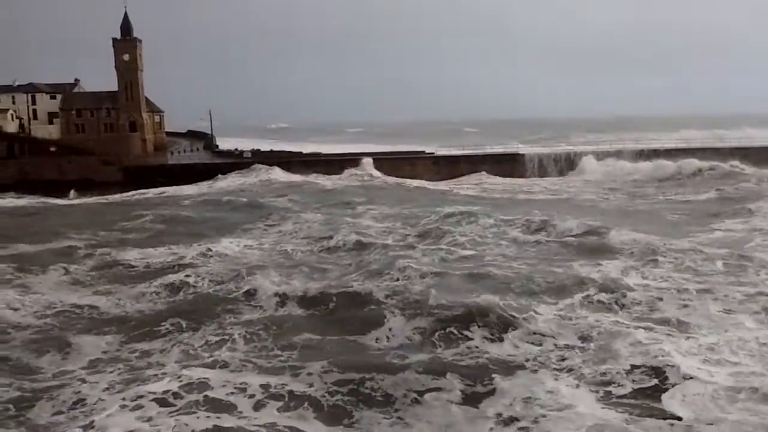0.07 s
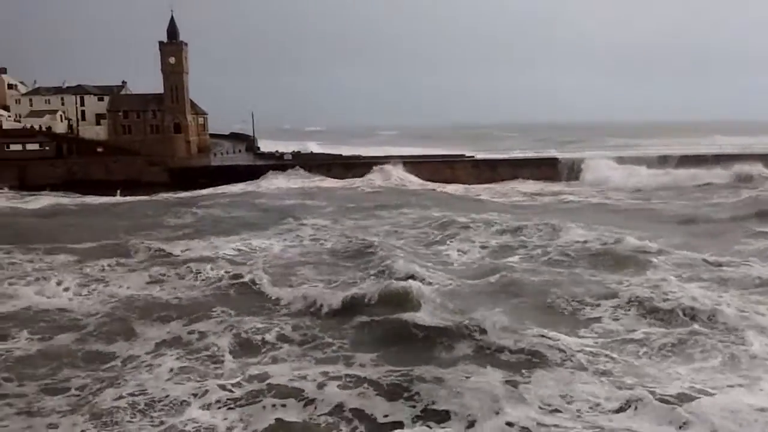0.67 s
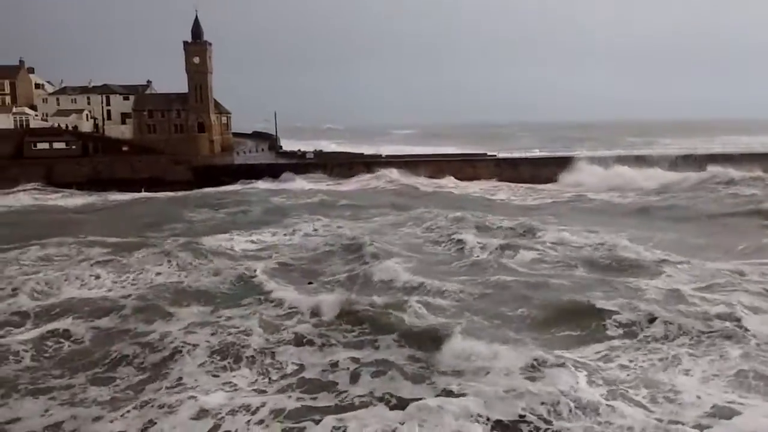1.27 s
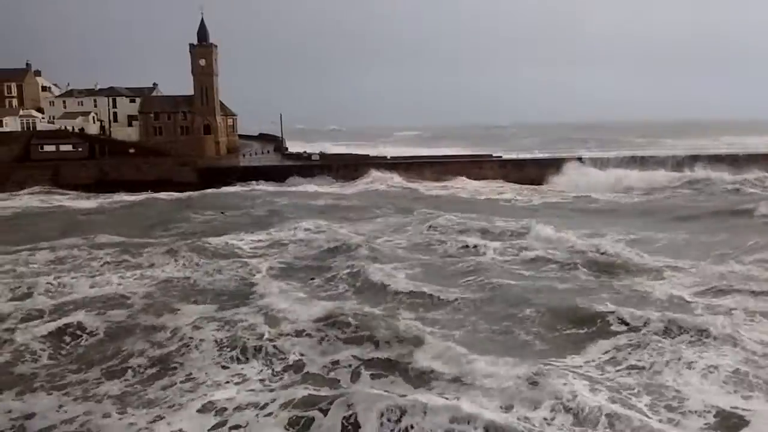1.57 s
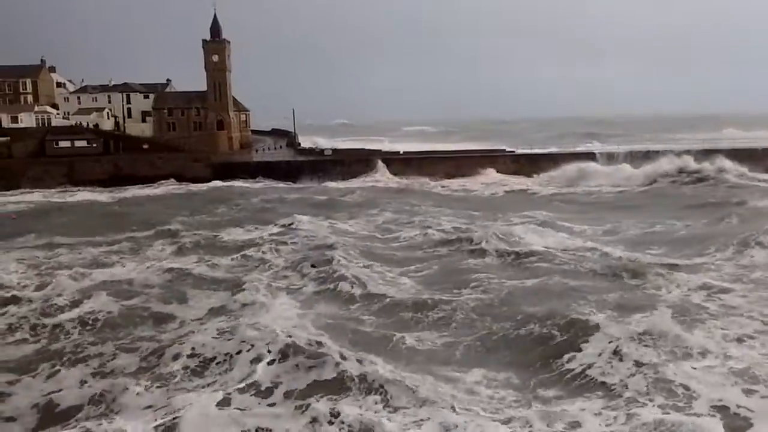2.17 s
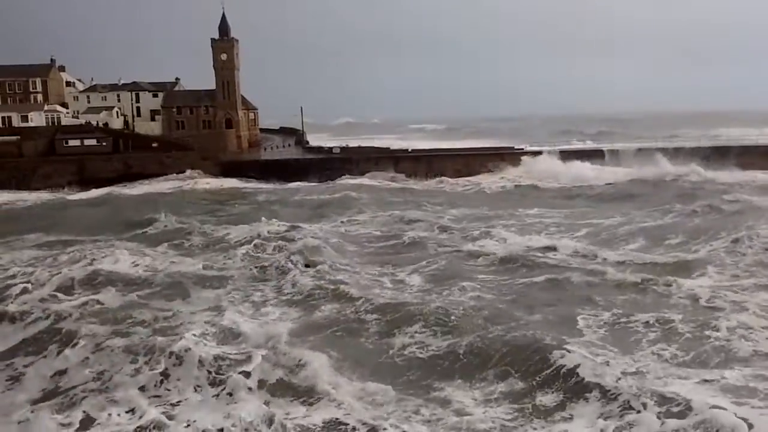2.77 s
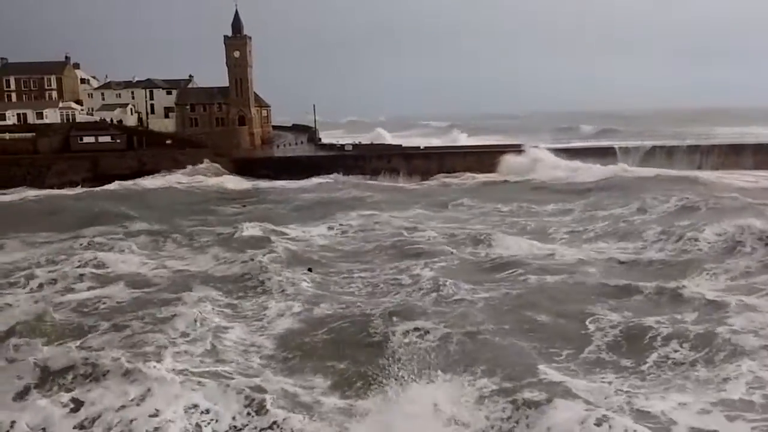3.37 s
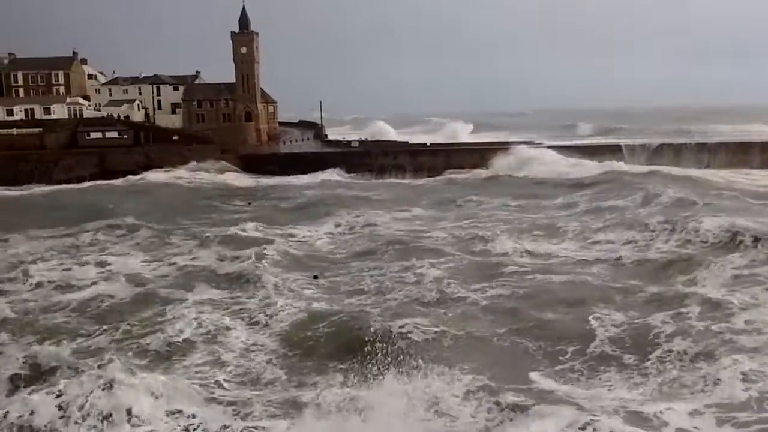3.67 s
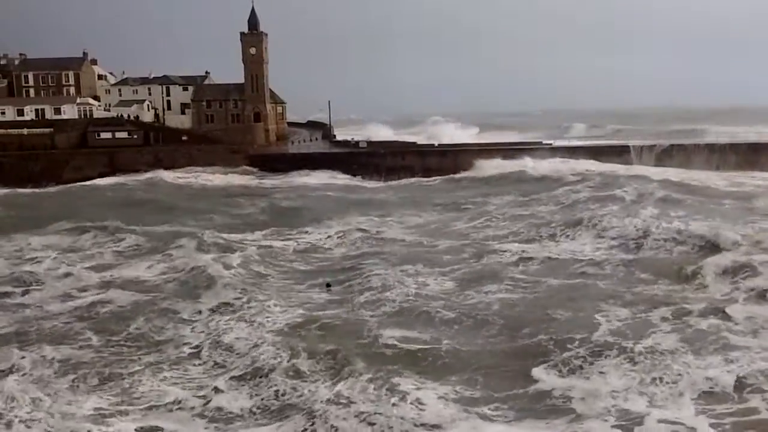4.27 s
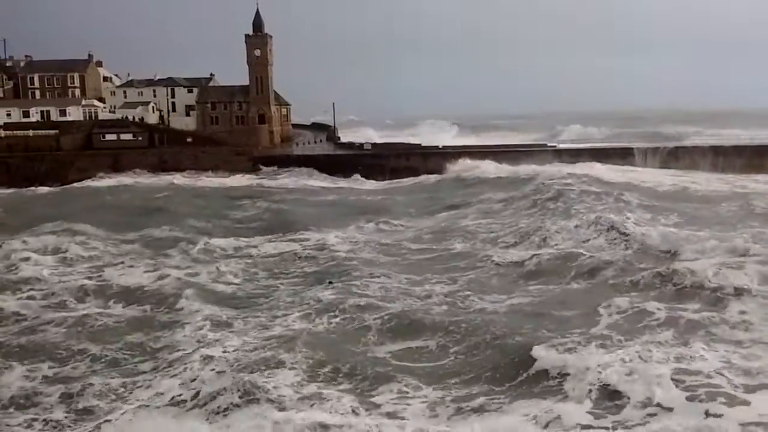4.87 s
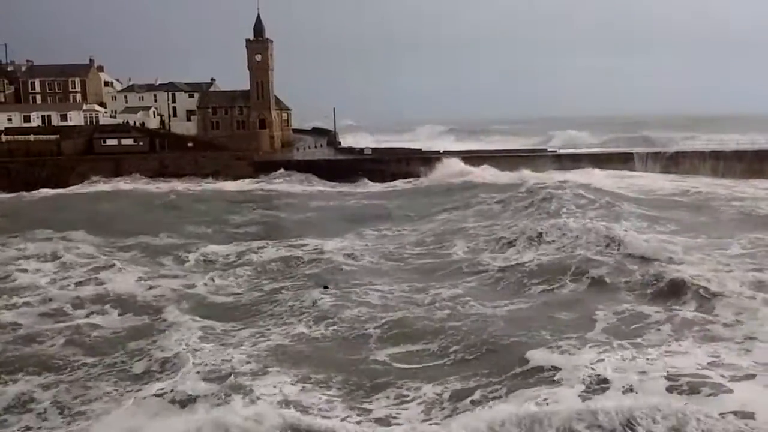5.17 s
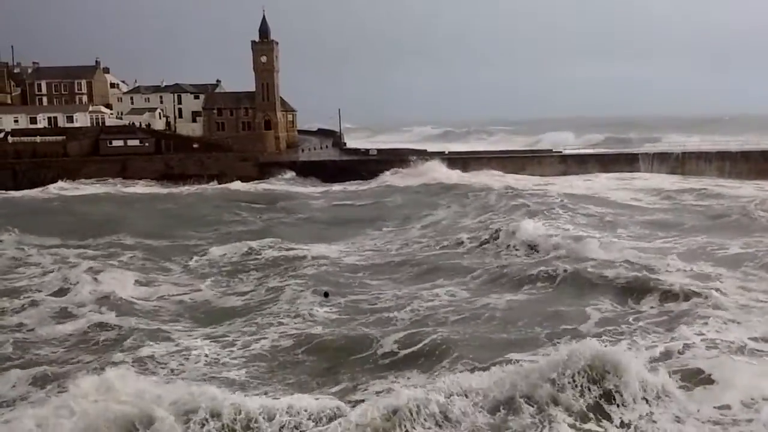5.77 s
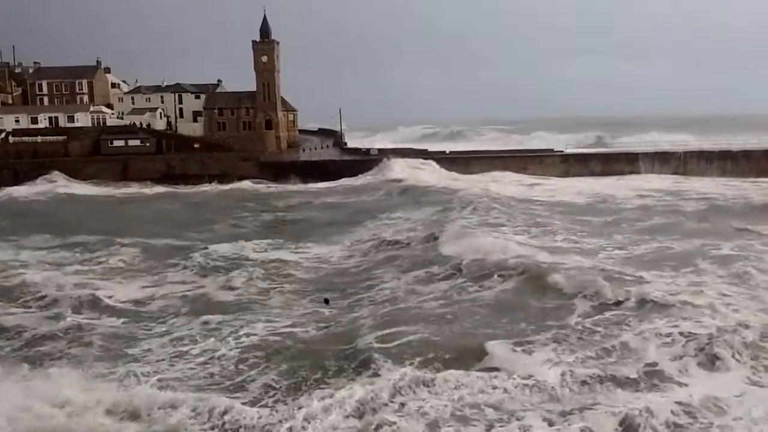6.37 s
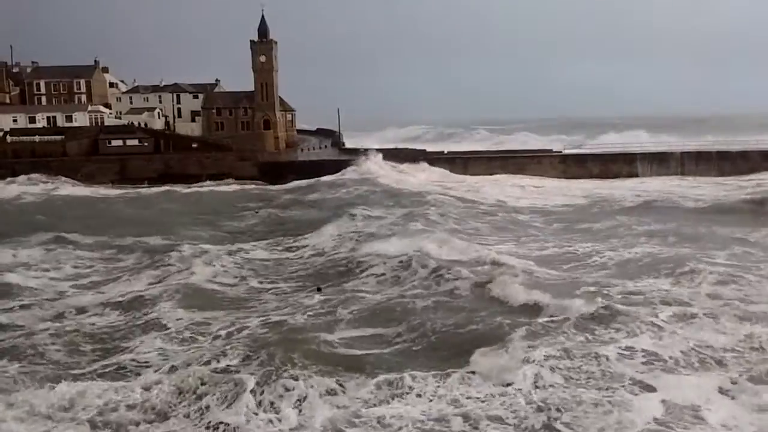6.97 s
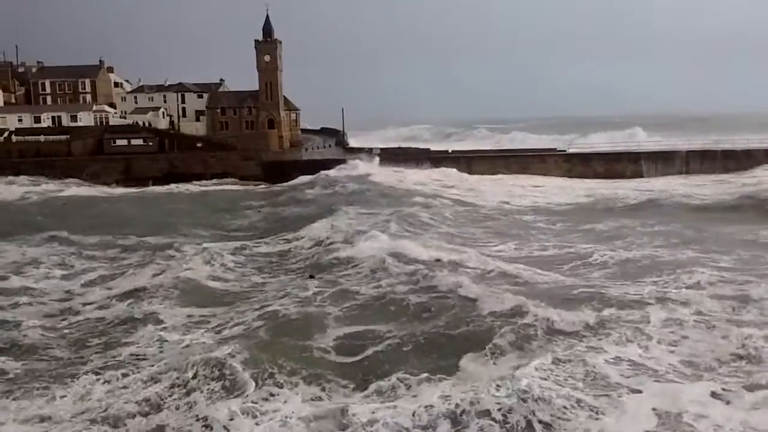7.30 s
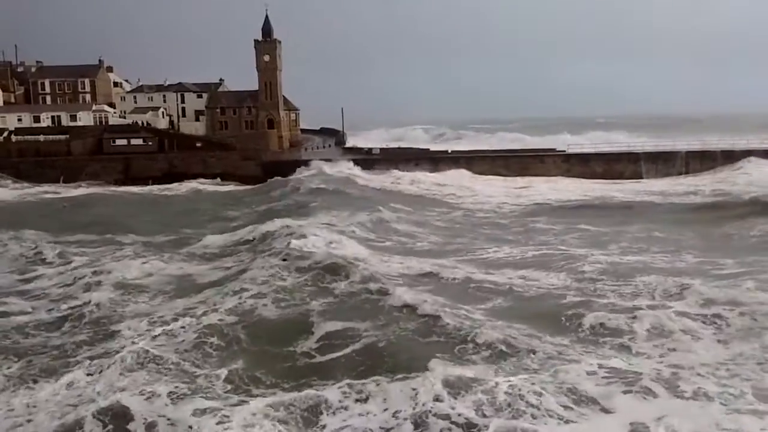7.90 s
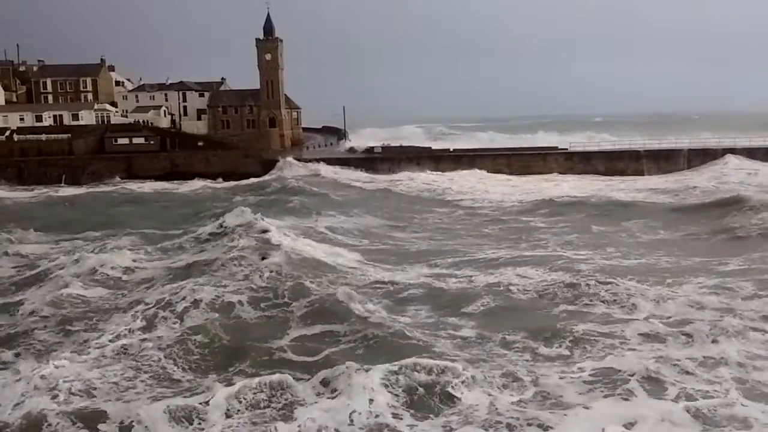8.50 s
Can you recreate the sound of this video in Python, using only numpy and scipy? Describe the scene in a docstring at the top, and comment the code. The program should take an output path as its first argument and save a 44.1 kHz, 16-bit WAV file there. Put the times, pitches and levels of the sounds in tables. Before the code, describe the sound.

Storm waves roar and fizz while strong wind buffets the microphone; two sharp drop hits briefly duck the sound before it swells back.

```python
"""Below a harbour wall, storm surf churns in a gale, heard through two close microphone ports.
Clouds of bubbles roar in the breakers over distant surf, foam fizzes and thrown water rains back.
Eddies rumble and thump on the ports, and spray spatters the housing.
Two drops and a hard gust strike a port; the limiter ducks and the sea swells slowly back."""
import sys
import numpy as np
from scipy import signal
from scipy.fft import rfft, irfft, next_fast_len
from scipy.io import wavfile
from scipy.ndimage import uniform_filter1d, minimum_filter1d

SR = 44100
rng = np.random.default_rng(int(sys.argv[2]) if len(sys.argv) > 2 else 0)


def digitize_waveform(pressure):
    """Quantize a signal to 16-bit integers and store it at the path in sys.argv[1].

    Rows of a 2-D input are taken as channels; values are limited to [-1, 1].
    """
    field = np.atleast_2d(pressure).T
    bounded = np.clip(field, -1, 1)
    quanta = np.round(bounded * 32767).astype(np.int16)
    wavfile.write(sys.argv[1], SR, quanta)


N = 376613
TIME = np.arange(N) / SR
FFT_SIZE = next_fast_len(N + 4096)
FREQS = np.fft.rfftfreq(FFT_SIZE, 1 / SR)


def undb(db):
    """Decibels to gain."""
    return 10 ** (np.asarray(db) / 20)


def unit(x):
    """Scale to rms 1."""
    return x / np.sqrt(np.mean(x ** 2))


def response(points):
    """An EQ curve: the gain at every frequency, drawn through points of f/Hz, level/dB."""
    hz, db = np.transpose(points)
    return undb(np.interp(np.log(FREQS + 1), np.log(hz), db))


def shape(x, gain):
    """Filter by a gain at every frequency."""
    return irfft(rfft(x, FFT_SIZE) * gain, FFT_SIZE)[..., :N]


def wander(rate_hz):
    """A smooth random modulator: sample and hold, slewed twice, at rms 1."""
    hold = int(SR / rate_hz)
    steps = np.repeat(rng.standard_normal(N // hold + 1), hold)
    return unit(uniform_filter1d(uniform_filter1d(steps, hold), hold)[:N])


def swell(crest_s, build_s, settle_s):
    """An envelope that rises smoothly to 1 at the crest and falls smoothly away."""
    age = TIME - crest_s
    return np.exp(-(age / np.where(age < 0, build_s, settle_s)) ** 2)


def noise():
    """White noise."""
    return rng.standard_normal(N)


def bursts(per_s, spread_db):
    """Bursting bubbles or droplets: many small clicks and a few big ones."""
    happens = rng.random(N) < per_s / SR
    clicks = happens * noise()
    size_db = spread_db * np.minimum(rng.exponential(size=N), 5)
    return unit(clicks * undb(size_db))


def at_ports(draw, shared):
    """Sound from all round differs between the ports; a share from straight ahead is alike."""
    return np.sqrt(1 - shared) * np.array([draw(), draw()]) + np.sqrt(shared) * draw()


def far_surf(level_db=-43.5):
    """Surf along the harbour wall merges into a dull, steady rumble."""
    # tone of the distant surf: f/Hz, level/dB
    rumble_eq = [(60, -22), (250, -3), (430, -3), (750, -10.5), (1500, -12), (4000, -60)]
    return unit(shape(at_ports(noise, shared=0.026), response(rumble_eq))) * undb(level_db)


def showers(build_s=0.081):
    """Water thrown up by a wave rains back in a bright, grainy hiss."""
    # tone of the falling water: f/Hz, level/dB
    hiss_eq = [(3000, -22), (5000, 3), (5700, 1), (6400, -8), (8000, 3), (10500, 0), (12500, -9),
               (15000, -9)]
    # falls of thrown water: crest t/s, level/dB, settling/s
    falls = [(4.02, -37, 0.27), (4.3, -40.5, 0.38), (7.06, -44, 0.3), (7.45, -45, 0.86)]
    envelope = sum(undb(db) * swell(s, build_s, settle_s) for s, db, settle_s in falls)
    drops = at_ports(lambda: bursts(per_s=5000, spread_db=2.5), shared=0.05)
    return unit(shape(drops, response(hiss_eq))) * envelope


def spray(lee_db=-8):
    """Flurries of fine droplets hit the housing, hardest on the windward right side."""
    # tone of droplets on the housing: f/Hz, level/dB
    droplet_eq = [(2500, -12), (5000, 3), (7000, 5), (9500, 3), (12000, -5), (15500, -24)]
    # flurries on the windward side: t/s, level/dB, decay/ms
    flurries = [(.245, -37, 50), (2.165, -22.5, 7.6), (2.556, -26, 21), (2.62, -44, 110), (2.677, -18, 1)]
    envelope = sum(undb(db) * (TIME >= s) * np.exp(-1000 * np.abs(TIME - s) / ms)
                   for s, db, ms in flurries)
    droplets = at_ports(lambda: bursts(per_s=12000, spread_db=2), shared=0)
    return unit(shape(droplets, response(droplet_eq))) * envelope * undb([[lee_db], [0]])


def gale():
    """Strength of the wind, 1 when it blows steadily."""
    # gusts and lulls against the steady gale: t/s, level/dB, rise and fall/s
    gusts = [(.05, 3, 0.089), (.28, 5, .056), (.46, 1.5, 0.035), (.7, 1, .2), (1.26, 1.5, 0.079),
             (1.52, 3.5, 0.044), (1.81, 3.5, 0.035), (2.05, 4, .07), (2.23, -3, 0.083), (2.77, 3.5, .046),
             (4.5, -1.5, .35), (6, 1.4, 0.27), (6.42, 1.5, 0.048), (6.7, -3, 0.13), (6.99, 1.5, .068),
             (7.31, 6, 0.072), (7.65, -0.5, 0.19), (8.37, 1, .08)]
    return undb(sum(db * swell(s, width_s, width_s) for s, db, width_s in gusts))


def wind(level_db=-27.5, flutter_hz=24, flutter_db=1.47, headroom=3.14):
    """Turbulence rumbles on each port separately and flutters within each gust."""
    # tone of the turbulence: f/Hz, level/dB
    rumble_eq = [(20, -8), (50, 0.5), (105, 2), (160, -2.5), (250, -11), (350, -15.5), (600, -17.5),
                 (1500, -52), (4000, -62)]
    rumble = unit(shape(at_ports(noise, shared=0), response(rumble_eq)))
    rumble *= undb(flutter_db * wander(flutter_hz))
    # the wind speed bounds the pressure that an eddy can reach
    return headroom * np.tanh(rumble / headroom) * undb(level_db) * gale()


def eddy(age, hz, cycles=0.46):
    """Pressure under a passing eddy: one push, then one pull; peak 1."""
    swing = -np.sin(2 * np.pi * hz * age) * np.exp(-(hz * age / cycles) ** 2)
    return swing / np.abs(swing).max()


def buffets(knocks_per_s=13, knock_db=-20, wake_db=-18, lee_db=-2.5):
    """Big eddies thump the housing, each in a ragged wake; small ones knock at random."""
    # big eddies on the windward side: t/s, level/dB, swing f/Hz
    big_eddies = [(0.664, -13.5, 70), (0.948, -12, 95), (0.983, -22, 90), (1.076, -13, 80),
                  (1.332, -14, 75), (1.6, -15, 80), (1.866, -14, 91), (2.097, -18, 125), (2.752, -17, 90),
                  (2.769, -19, 110), (2.785, -16, 100), (6.414, -16, 90), (6.44, -14, 175),
                  (6.458, -15, 165), (6.586, -13, 185), (6.611, -13, 180), (6.636, -20, 185),
                  (6.873, -15, 199), (7.275, -3.5, 175), (7.335, -7, 178), (7.652, -10.5, 158),
                  (8.357, -12, 101)]
    # tone of their wakes: f/Hz, level/dB
    wake_eq = [(30, -14), (110, 3), (260, -6), (420, -18), (900, -19), (3000, -70)]
    thumps = sum(undb(db) * eddy(TIME - s, hz) for s, db, hz in big_eddies)
    arrivals = (rng.random(N) < knocks_per_s / SR) * rng.uniform(-0.98, 1, N)
    knock = eddy(TIME[:2048] - TIME[1024], hz=79)
    knocks = undb(knock_db) * signal.fftconvolve(arrivals, knock, mode="same") * gale()
    stirred = sum(undb(db + wake_db) * swell(s, build_s=0.013, settle_s=0.02) for s, db, _ in big_eddies)
    wake = unit(shape(at_ports(noise, shared=0.76), response(wake_eq))) * stirred
    roughness = 1 + 0.3 * wander(rate_hz=600)
    return ((thumps + knocks) * roughness + wake) * undb([[lee_db], [0]])


def strikes(swing_decay_s=0.005, through_housing=0.27):
    """A drop rings the port's tiny cavity; drop or gust pushes the diaphragm through one slow swing."""
    # resonances of the cavity: f/Hz, level/dB, decay/ms
    cavity_modes = [(2220, -21, 0.13), (4400, 3, 0.16), (8850, 12, 0.15), (11600, -13, 0.11)]
    # two drops and a hard gust on the right port: t/s, tick level/dB, swing level/dB, swing f/Hz
    hits = [(3.1015, 12.5, -14, 100), (3.2527, 16, -3, 115), (7.2722, -28, -8, 174)]
    out = np.zeros((2, N))
    t = TIME[:1000]
    ring = sum(undb(db) * np.sin(2 * np.pi * hz * t) * np.exp(-1000 * t / ms)
               for hz, db, ms in cavity_modes)
    tick = ring / np.abs(ring).max()
    for s, tick_db, swing_db, swing_hz in hits:
        swing = np.sin(2 * np.pi * swing_hz * t) * np.exp(-t / swing_decay_s)
        span = slice(int(s * SR), int(s * SR) + len(t))
        out[1, span] += undb(swing_db) * swing - undb(tick_db) * tick
        # the housing carries the tick across to the other port
        out[0, span] -= through_housing * undb(tick_db) * tick
    return out


def plunge(level_db=-32.5, centre_hz=1650, width_octaves=0.17):
    """The nearest breaker traps a cloud of air; bubbles of much the same size ring in one band."""
    band = np.exp(-(np.log2((FREQS + 1) / centre_hz) / width_octaves) ** 2 / 2)
    bubbles = unit(shape(at_ports(noise, shared=0.1), band))
    return bubbles * undb(level_db) * swell(crest_s=5, build_s=0.38, settle_s=0.3)


def churn(x, eq, depth_db, rate_hz=16):
    """Colour a sound and let each octave swell on its own, as patches of water break and settle."""
    spectrum = rfft(x, FFT_SIZE) * response(eq)
    octave = np.clip(np.log2((FREQS + 1) / 200), 0, 6)
    out = 0
    for k in range(7):
        band_gain = np.maximum(0, 1 - np.abs(octave - k))
        band = irfft(spectrum * band_gain, FFT_SIZE)[:, :N]
        out = out + band * undb(depth_db * wander(rate_hz))
    return unit(out)


def sea_levels(roar_bed_db=-33, fizz_bed_db=-39.5, foam_linger=1.14):
    """Envelopes of roar and fizz: each breaker adds its power to the bed of churning sea."""
    # breaking waves: crest t/s, roar level/dB, fizz level/dB, build-up/s, roar settling/s
    breakers = [(.2, -29.5, -37.5, 0.54, 0.31), (.66, -32.5, -40.2, 0.19, 0.19),
                (1.22, -34.5, -36.2, 0.4, 0.36), (1.78, -33, -44.3, .11, 0.093),
                (1.99, -32, -36.5, 0.7, 0.92), (2.6, -30.5, -32.8, 0.077, 0.34),
                (3.05, -34, -34.5, 0.21, .27), (3.22, -30, -37.5, 0.27, 0.51),
                (4.03, -29.5, -36, 0.37, .08), (4.31, -30.5, -30, 0.4, .41), (5.2, -35, -33.5, 0.24, 0.32),
                (5.36, -29.5, -33.5, 0.89, 0.61), (6.04, -29, -35, 0.74, 0.49),
                (6.41, -31, -38, 0.069, .15), (7.07, -34.5, -36, 0.33, 0.42), (7.78, -35, -44, .67, 0.68),
                (8.29, -31, -37, 0.1, 0.31)]
    roar_power, fizz_power = undb(roar_bed_db) ** 2, undb(fizz_bed_db) ** 2
    for s, roar_db, fizz_db, build_s, settle_s in breakers:
        roar_power += (undb(roar_db) * swell(s, build_s, settle_s)) ** 2
        fizz_power += (undb(fizz_db) * swell(s, build_s, settle_s * foam_linger)) ** 2
    return np.sqrt(roar_power), np.sqrt(fizz_power)


def surf():
    """Clouds of bubbles roar in the breakers; the foam they leave bursts in a dense fizz."""
    # tone of the bubble clouds: f/Hz, level/dB
    roar_eq = [(60, -31), (250, -8.5), (450, -6), (750, -1.05), (1200, 0), (1650, 1), (2100, -2),
               (2550, -5), (3000, -9.5), (3600, -10), (6000, -62)]
    # tone of the bursting foam: f/Hz, level/dB
    fizz_eq = [(1500, -12), (2500, 3.5), (3050, 0.5), (3700, 0.9), (4200, 1.5), (4700, 2.5), (5400, -6),
               (6300, -11), (7700, -6), (9600, -8), (11000, -14.5), (12500, -19.5), (14000, -23.5),
               (15500, -24)]
    roar_gain, fizz_gain = sea_levels()
    roar = churn(at_ports(noise, shared=0.043), roar_eq, depth_db=0.88)
    foam = at_ports(lambda: bursts(per_s=25000, spread_db=1.5), shared=0.09)
    fizz = churn(foam, fizz_eq, depth_db=1.2)
    return roar * roar_gain + fizz * fizz_gain


def scene():
    """Sea, wind and flying water as pressure at the two ports."""
    return surf() + far_surf() + plunge() + wind() + buffets() + strikes() + spray() + showers()


def widen(ports, port_lag_s=14 / SR):
    """Each channel subtracts the other port's delayed sound; lifting the side boosts the wind too."""
    # crossfeed from the opposite port: f/Hz, level/dB
    crossfeed_eq = [(100, -2), (1500, -4), (6500, -4.5), (9500, -10), (15000, -42)]
    # lift of the side signal: f/Hz, level/dB
    side_eq = [(25, -5), (50, 2), (100, 8.5), (250, 14.5), (650, 10), (1000, 4.5), (1600, 2), (4000, 1.5)]
    # the channels' unequal sensitivity: f/Hz, left minus right level/dB
    balance = [(60, 1), (400, 1), (700, 2), (2000, -0.3), (3200, 4), (4700, -1), (6000, 6), (7500, -4.5),
               (10500, 2.2), (14000, 2)]
    crossfeed = response(crossfeed_eq) * np.exp(-2j * np.pi * FREQS * port_lag_s)
    mid = shape((ports[0] + ports[1]) / 2, 1 - crossfeed)
    side = shape((ports[0] - ports[1]) / 2, (1 + crossfeed) * response(side_eq))
    lean = np.sqrt(response(balance))
    return np.array([shape(mid + side, lean), shape(mid - side, 1 / lean)])


def limiter(x, ceiling_db=-0.7, recovery_db_per_s=10.5):
    """The gain ducks just ahead of any peak over the ceiling and creeps back at a steady rate."""
    peak_db = 20 * np.log10(np.abs(x).max(axis=0) + 1e-9)
    over_db = np.maximum(0, peak_db - ceiling_db)
    recovery_db = recovery_db_per_s * TIME
    gain_db = recovery_db - np.maximum.accumulate(over_db + recovery_db)
    look_ahead_db = minimum_filter1d(gain_db, size=45)
    return x * undb(uniform_filter1d(look_ahead_db, size=45))


def record(dry):
    """Stereo widening, a limiter with slow recovery, and a steep top cut."""
    top_cut = signal.ellip(10, 0.1, 80, 15450, fs=SR, output="sos")  # low-pass at 15450 Hz
    return signal.sosfilt(top_cut, limiter(widen(dry)))


dry = scene()
out = record(dry)
digitize_waveform(out)
```